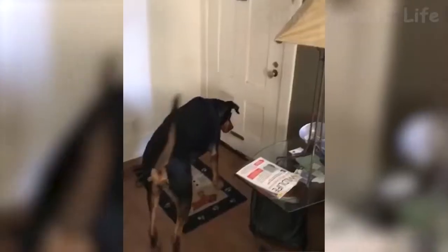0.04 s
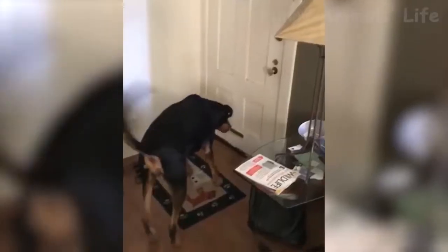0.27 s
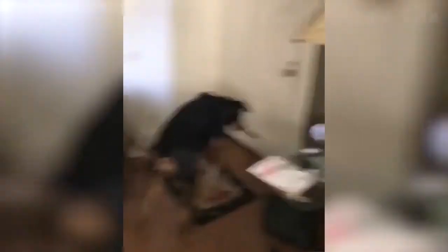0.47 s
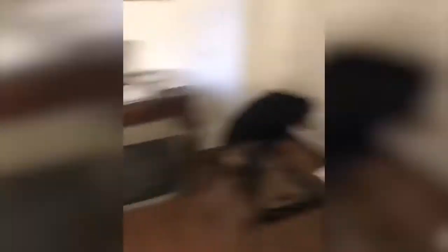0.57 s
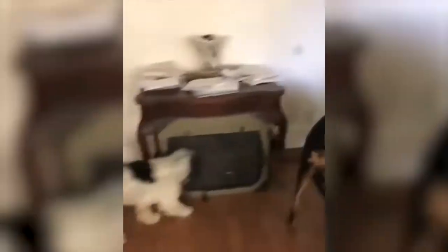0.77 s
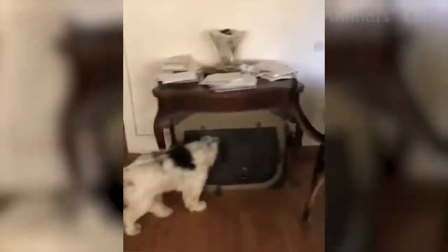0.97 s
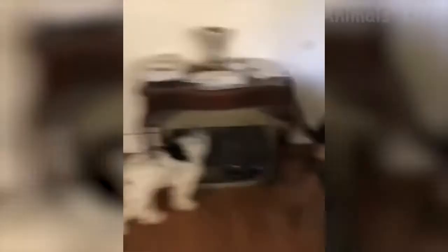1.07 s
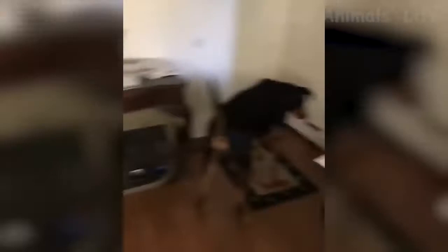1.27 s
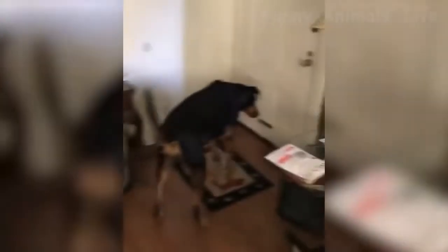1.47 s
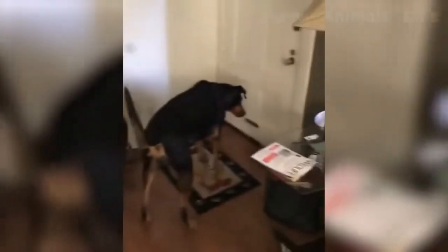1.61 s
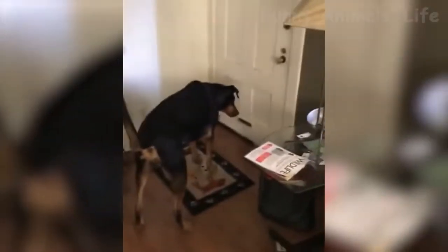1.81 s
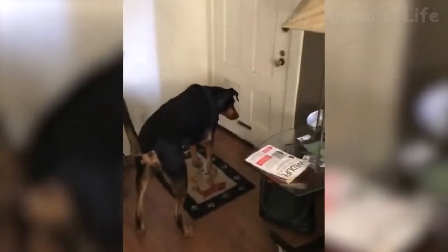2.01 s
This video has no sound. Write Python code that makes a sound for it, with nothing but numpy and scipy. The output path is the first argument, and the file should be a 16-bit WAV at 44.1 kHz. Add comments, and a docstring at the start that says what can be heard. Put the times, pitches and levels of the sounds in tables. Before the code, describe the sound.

A large dog barks once, loud and sharp, in a house hall while collar tags jingle

```python
"""Metal tags jingle on a collar, over a quiet house rumble; then a large dog barks once at a closed door.
Afterwards the tags jingle on, and paws and claws touch the floor of a furnished hall.
The bark is a source-filter voice: vocal fold pulses, rasp and breath shaped by an opening mouth.
Tags, claws and floorboard are decaying modes; rustle, rumble and air are shaped noise.
The hall and the rooms beyond answer as noise tails with a decay time that depends on frequency."""
import sys
import numpy as np
from scipy import signal
from scipy.fft import rfft, irfft, next_fast_len
from scipy.io import wavfile
from scipy.ndimage import uniform_filter1d, minimum_filter1d, map_coordinates

SR = 44100
rng = np.random.default_rng(int(sys.argv[2]) if len(sys.argv) > 2 else 0)


def inscribe(sig):
    """Save sig as 16-bit PCM at rate SR to the path in sys.argv[1].

    A 1-D sig is mono; a 2-D sig holds one channel per row.
    Samples are clipped to [-1, 1] before scaling.
    """
    pcm = np.round(np.clip(np.atleast_2d(sig).T, -1, 1) * 32767)
    wavfile.write(sys.argv[1], SR, pcm.astype(np.int16))


N = 90404

# Low rumble over time: (time [s], level [dB])
RUMBLE_LEVEL = [(.03, -67.5), (.1, -57.5), (.2, -51), (.26, -34.5), (.31, -51), (.45, -58.5), (.68, -50),
                (.75, -67.5), (.87, -59), (1.0, -62.5), (1.8, -61.5), (1.88, -56.5), (1.95, -64.5)]
# Rumble spectrum: (frequency [Hz], relative density [dB per Hz])
RUMBLE_SPECTRUM = [(20, -0.5), (59, 3), (86, -10), (115, 0.5), (140, -11), (250, -16), (320, -46.5),
                   (550, -120)]
# Rustle of fur and paws over time: (time [s], level [dB])
RUSTLE_LEVEL = [(0, -70.5), (.12, -59.5), (.45, -62.5), (.58, -63.5), (.68, -65.5), (.75, -64.5),
                (.93, -63), (1.04, -65.5), (1.11, -72.5), (1.32, -83), (1.37, -67), (1.41, -71.5),
                (1.45, -75.5), (1.67, -75), (2.0, -83.5), (2.015, -66.5)]
# Rustle spectrum: (frequency [Hz], relative level [dB])
RUSTLE_SPECTRUM = [(500, -8.5), (1200, -3.5), (1900, -4.5), (2500, -1.5), (6000, -13.5), (14000, -20.5)]
# Room air spectrum: (frequency [Hz], relative density [dB per Hz])
AIR_SPECTRUM = [(120, -5.5), (400, -12.5), (600, -19.5), (800, -18), (1900, -25), (2600, -28.5),
                (12800, -33.5)]
AIR_DB = -67.5

# Decay of the hall: (frequency [Hz], decay time T60 [s])
HALL_DECAY = [(400, 0.27), (1500, 0.25), (12000, 0.11)]
# The rooms beyond: (frequency [Hz], decay time T60 [s], colouring of the voice [dB])
FAR_ROOMS = [(300, 1.2, 10), (382.2, 2.7, -4), (466, 4.4, -14), (563, 1.9, -5), (910, 1.9, -2),
             (1100, 0.93, -4), (1270, 0.93, 9.5), (2980, 1.1, -2)]
HALL_DB, TAG_HALL_DB, HOUSE_DB = -6.5, -7, -31
ECHO_DELAY_S = 0.0065  # for the hall and the rooms beyond alike
FLICKER_DB, FLICKER_RATE = 2, 40  # far echo: depth, knots a second

# A pad on the floor: (time [s], level [dB])
PAW_STEPS = [(1.931, -54)]
# The floorboard's modes: (frequency [Hz], relative level [dB])
BOARD_MODES = [(200, 0), (420, 0), (1250, -3), (2100, -4)]
# Claws touch the boards: (time [s], starting level [dB], frequency [Hz])
CLAW_TOUCHES = [(1.37, -63.5, 2506), (1.558, -61.5, 2063), (1.676, -64, 3530), (1.791, -65.5, 4000)]
# Dry treble ticks: (time [s], starting level [dB])
TICK_TIMES = [(0.9557, -50), (1.7474, -41)]

# Tag strikes: (time [s], reference level of click and splash [dB], ring length [share of the free ring],
# then the starting level of each tag mode, low to high [dB])
TAG_STRIKES = [(0.0308, -39.5, 0.98, -70.5, -87.5, -54, -57.5), (0.1411, -31, 1, -55.5, -91.5, -37, -48.5),
               (0.404, -45.5, 0.76, -75, -64, -58.5, -50.5), (0.6424, -40.5, 0.98, -68, -66, -59, -52.5),
               (0.6509, -39, 1, -52.5, -55.5, -42, -53), (0.7312, -34, 0.85, -94.5, -76, -40.5, -46),
               (0.8101, -39.5, 0.82, -75.5, -51.5, -55.5, -51.5),
               (0.8959, -45.5, 0.285, -76, -84, -78.5, -51), (0.9976, -41, 1, -82.5, -88, -51, -48),
               (1.4057, -50.5, 0.939, -81, -72.5, -70.5, -64), (1.7913, -46, 0.97, -76, -76, -81, -58.5)]
# The tags' modes: (frequency [Hz], free decay time T60 [s])
TAG_MODES = [(6190, 0.28), (7600, .2), (8625, .19), (11320, 0.19)]
# Spectrum of a strike's click and splash: (frequency [Hz], relative level [dB])
STRIKE_SPECTRUM = [(3500, -23), (7000, -7), (8600, -8), (9800, -9), (11400, -1.5), (12500, -7.5),
                   (13800, -3)]
RATTLE_DB = 2.5  # flutter depth of the ringing modes
CLICK_DB, SPLASH_DB = -12, -18.5  # relative to each strike's reference level
SPLASH_T60_S = 0.18  # for a free ring

# Thin side tones of the throat: (time [s], length [s], frequency [Hz], level [dB])
SIDE_TONES = [(0.229, 0.027, 830, -20.5), (0.225, 0.048, 1377, -18.5), (0.284, .06, 1000, -27),
              (0.524, 0.068, 2047, -54)]
# The bark's pitch: (time [s], frequency [Hz])
BARK_PITCH = [(.203, 160), (.221, 270), (.233, 282), (.25, 365), (.27, 405), (.29, 427), (.33, 447),
              (.352, 330), (.372, 292)]
# The bark's parts: (time [s], lowest tone [dB], overtones [dB], breath [dB])
BARK_LEVELS = [(.203, -51.5, -55, -73.5), (.221, -30, -26, -59.5), (.226, -27.5, -17, -57),
               (.236, -18, -16.5, -54), (.248, -18, -18, -40.5), (.26, -19, -12, -34),
               (.272, -14.5, -15.5, -43.5), (.286, -12, -17, -42), (.302, -9.5, -15.5, -35.5),
               (.308, -29, -21.5, -40), (.334, -18.5, -28, -44.5), (.352, -32, -27.5, -49),
               (.372, -36.5, -41.5, -57.5), (.39, -66, -65.5, -77.5)]
# Mouth nearly shut: (frequency [Hz], relative level [dB])
NARROW_MOUTH = [(600, -7.5), (830, 3), (1080, -25), (1390, -2), (1700, -17.5), (2030, -13.5), (2350, -44.5)]
# Mouth open: (frequency [Hz], relative level [dB])
OPEN_MOUTH = [(600, -6.5), (840, -1.5), (990, -4), (1130, -3), (1310, -3.5), (1480, -8.5), (1700, -12),
              (1980, -10), (2350, -29.5), (3200, -42)]
# Breath spectrum: (frequency [Hz], relative density [dB per Hz])
BREATH_SPECTRUM = [(2000, -23), (2650, 2.5), (3500, -16), (4400, -3.5), (5100, 0.5), (6000, -9),
                   (12000, -12), (14000, -8.5)]
OPENS_S, OPENING_S = .238, .015  # start and length of the mouth's opening
ROUGH = .09  # share of rasp in the power mix with the overtones
JITTER, SHIMMER_DB = .008, 2  # irregularity of pitch (share) and of overtone level

START_S = .03  # silence before the sound opens
CEILING, LOOKAHEAD_S = .51, .0015  # limiter: amplitude, averaging span
TOP_HZ = 14100


def amp(db):
    """Logarithmic level: decibels to amplitude gain."""
    return 10 ** (np.asarray(db) / 20)


def unit(x):
    """Normalisation: x scaled to rms 1."""
    return x / np.sqrt(np.mean(x ** 2) + 1e-20)


def along(points, hz):
    """Interpolation of (Hz, value) points on a logarithmic frequency axis."""
    f, v = np.transpose(points)
    return np.interp(np.log(hz + 1), np.log(f + 1), v)


def curves(rows):
    """Linear interpolation: one value per sample for each column after the time."""
    s, *columns = np.transpose(rows)
    return [np.interp(np.arange(N) / SR, s, column) for column in columns]


def wobble(rate):
    """Slow random modulation: a smooth curve through random knots, rate of them a second."""
    knots = rng.standard_normal(int(N * rate / SR) + 4)
    return map_coordinates(knots, [np.arange(N) * rate / SR])


def filtered(x, response):
    """Linear filtering: the spectrum of x multiplied by a response of frequency."""
    m = next_fast_len(N + SR // 2)
    return irfft(rfft(x, m) * response(np.fft.rfftfreq(m, 1 / SR)), m)[..., :N]


def noise(spectrum):
    """Spectral shaping: white noise coloured by a spectrum that falls away at both ends, at rms 1."""
    closed = [(10, -120)] + list(spectrum) + [(spectrum[-1][0] * 2, -120)]
    return unit(filtered(rng.standard_normal(N), lambda hz: amp(along(closed, hz))))


def decay(t, start_s, db, t60):
    """Exponential damping: silence, then a sudden onset that falls 60 dB in t60 seconds."""
    return (t >= start_s) * amp(db - 60 * np.clip(t - start_s, 0, 1) / t60)


def patchy(x, depth_db):
    """Time-frequency modulation: random louder and softer patches, smoothed over both axes."""
    z = signal.stft(x, nperseg=256)[2]
    field = uniform_filter1d(rng.standard_normal(z.shape), size=4, axis=0)
    field = uniform_filter1d(field, size=6, axis=1)
    return unit(signal.istft(z * amp(depth_db * unit(field)), nperseg=256)[1][:N])


def background():
    """Amplitude-modulated noise: lumpy low rumble, patchy rustle and nearly steady room air."""
    rumble = amp(curves(RUMBLE_LEVEL)[0] + 3.1 * wobble(36)) * noise(RUMBLE_SPECTRUM)
    rustle_gain = amp(curves(RUSTLE_LEVEL)[0] + 0.9 * wobble(60))
    rustle = rustle_gain * patchy(noise(RUSTLE_SPECTRUM), depth_db=3)
    air = amp(AIR_DB + 0.49 * wobble(2.5)) * noise(AIR_SPECTRUM)
    return rumble + rustle + air


def echo(x, decays, size=256):
    """Reverberation: convolution with a noise tail whose frequencies each die at their own speed."""
    hz, t, z = signal.stft(rng.standard_normal(N), SR, nperseg=size)
    t60 = along(decays, hz)[:, None]
    tail = signal.istft(z * amp(-60 * t / t60), SR, nperseg=size)[1]
    delayed = np.pad(x, (round(ECHO_DELAY_S * SR), 0))
    return signal.fftconvolve(delayed, tail / np.linalg.norm(tail))[:N]


def house(x):
    """Coloured reverberation: the far rooms filter the voice, and their ring flickers."""
    rows = np.array(FAR_ROOMS)
    coloured = filtered(x, lambda hz: amp(along(rows[:, ::2], hz)))
    far = echo(coloured, rows[:, :2], size=1024)
    return amp(HOUSE_DB + FLICKER_DB * wobble(FLICKER_RATE)) * far


def paws():
    """Modal excitation: a soft knock rings the floorboard's modes briefly."""
    t = np.arange(N) / SR
    return sum(decay(t, s, db + level, 0.022) * np.sin(2 * np.pi * hz * (t - s))
               for s, db in PAW_STEPS for hz, level in BOARD_MODES)


def claws():
    """Damped oscillation with random phase: each touch is a short rough ring of its own pitch."""
    t = np.arange(N) / SR
    grain = wobble(360)
    return sum(decay(t, s, db, 0.037) * np.sin(2 * np.pi * hz * t + 1.52 * grain)
               for s, db, hz in CLAW_TOUCHES)


def ticks():
    """Impulsive noise: treble bursts that die within milliseconds."""
    t = np.arange(N) / SR
    source = noise([(9000, -40), (11000, 0), (14000, 2)])
    return sum(decay(t, s, db, 0.0037) for s, db in TICK_TIMES) * source


def tags():
    """Modal synthesis: each strike clicks, splashes and rings modes that flutter as the tags rattle together."""
    out = np.zeros(N + SR)
    t = np.arange(SR // 3) / SR
    # one complex flutter per mode, in level and phase, shared by all strikes
    flutters = [amp(RATTLE_DB * wobble(300)) * np.exp(1.1j * wobble(250)) for _ in TAG_MODES]
    for s, reference_db, length, *levels in TAG_STRIKES:
        start = round(s * SR)
        share = max(length, .1)
        ring = np.zeros(len(t))
        for (hz, t60), db, flutter in zip(TAG_MODES, levels, flutters):
            flutter_now = np.roll(flutter, -start)[:len(t)]
            tone = np.imag(np.exp(2j * np.pi * hz * t) * flutter_now)
            ring += amp(db - 60 * t / (t60 * share)) * tone
        click = amp(CLICK_DB - 60 * t / 0.0073)
        splash = amp(SPLASH_DB - 60 * t / (SPLASH_T60_S * share))
        strike = amp(reference_db) * (click + splash) * noise(STRIKE_SPECTRUM)[:len(t)]
        out[start:][:len(t)] += ring + strike
    return out[:N]


def whine():
    """Modulated oscillation: short thin tones of the throat swell and fade, unsteady in level and phase."""
    t = np.arange(N) / SR
    out = np.zeros(N)
    for s, length, hz, db in SIDE_TONES:
        swell = np.sqrt(np.abs(np.sin(np.pi * np.clip((t - s) / length, 0, 1))))
        tone = np.sin(2 * np.pi * hz * t + 0.3 * wobble(40))
        out += amp(db + 1.93 * wobble(59)) * swell * tone
    return out


def bark():
    """Source-filter principle: fold pulses, rasp and breath pass a throat that widens as the mouth opens."""
    t = np.arange(N) / SR
    pitch_hz = curves(BARK_PITCH)[0]
    low_db, over_db, breath_db = curves(BARK_LEVELS)
    opened = np.clip((t - OPENS_S) / OPENING_S, 0, 1)
    phase = 2 * np.pi * np.cumsum(pitch_hz * (1 + JITTER * wobble(200))) / SR

    overtones = np.zeros(N)
    for k in range(2, 20):
        narrow_db = along(NARROW_MOUTH, k * pitch_hz)
        open_db = along(OPEN_MOUTH, k * pitch_hz)
        mouth_db = (1 - opened) * narrow_db + opened * open_db
        tone = np.sin(k * phase + rng.normal(0, k / 4))
        overtones += amp(mouth_db + SHIMMER_DB * wobble(88.3)) * tone

    puff = 1 + np.cos(phase)  # airflow pulses once per fold cycle
    rasp = np.sqrt(1 - opened) * noise(NARROW_MOUTH) + np.sqrt(opened) * puff * noise(OPEN_MOUTH)
    voiced = np.sqrt(1 - ROUGH) * overtones + np.sqrt(ROUGH) * rasp
    lowest = np.sqrt(2) * np.sin(phase)  # rms 1
    breath = puff * noise(BREATH_SPECTRUM)
    on = (t > BARK_LEVELS[0][0]) & (t < BARK_LEVELS[-1][0])
    return on * (amp(low_db) * lowest + amp(over_db) * voiced + amp(breath_db) * breath)


def scene():
    """Superposition: direct sounds, their room echoes and the background add at the microphone."""
    voice = bark() + whine()
    small = tags() + claws() + ticks() + paws()
    voice_echo = amp(HALL_DB) * echo(voice, HALL_DECAY) + house(voice)
    small_echo = amp(TAG_HALL_DB) * echo(small, HALL_DECAY)
    return (voice + voice_echo + small + small_echo + background())[None]


def record(dry):
    """Peak limiting and band limiting: sound opens after a short silence, peaks are held, the top is cut."""
    x = dry * np.clip((np.arange(N) / SR - START_S) / 0.00078, 0, 1)
    span = round(LOOKAHEAD_S * SR)
    needed_gain = CEILING / np.maximum(np.abs(x), CEILING)
    gain = uniform_filter1d(minimum_filter1d(needed_gain, size=2 * span), size=span)
    return filtered(x * gain, lambda hz: hz < TOP_HZ)


dry = scene()
out = record(dry)
inscribe(out)
```